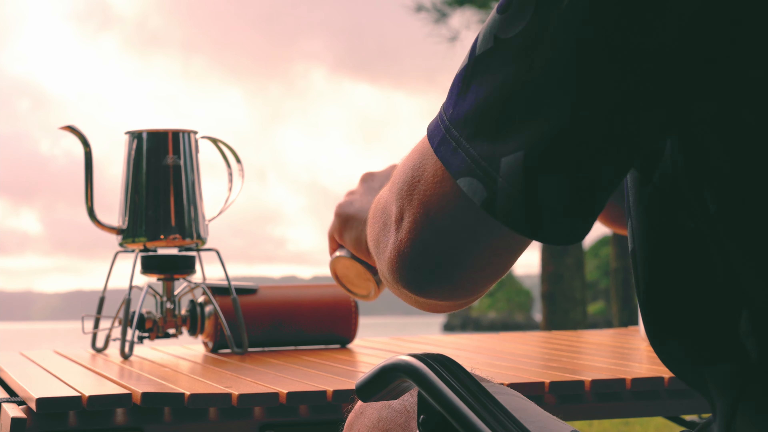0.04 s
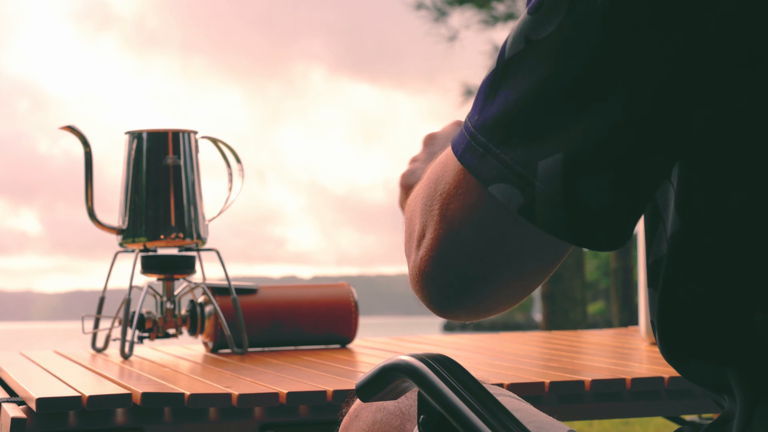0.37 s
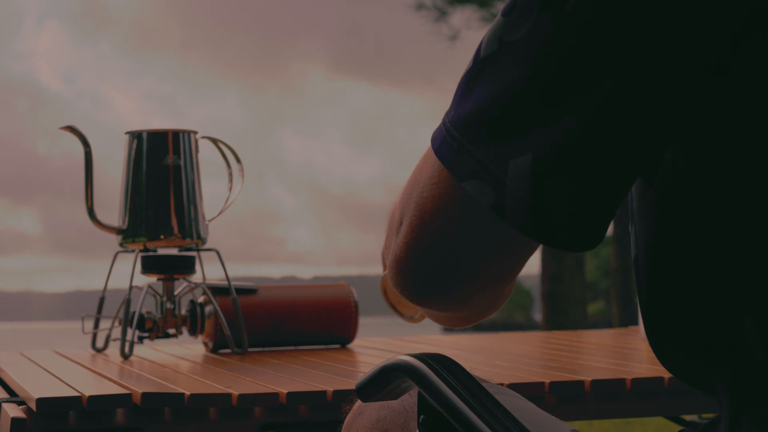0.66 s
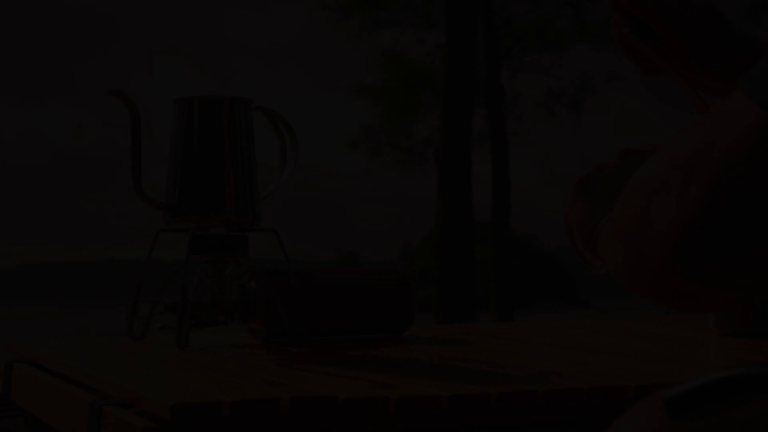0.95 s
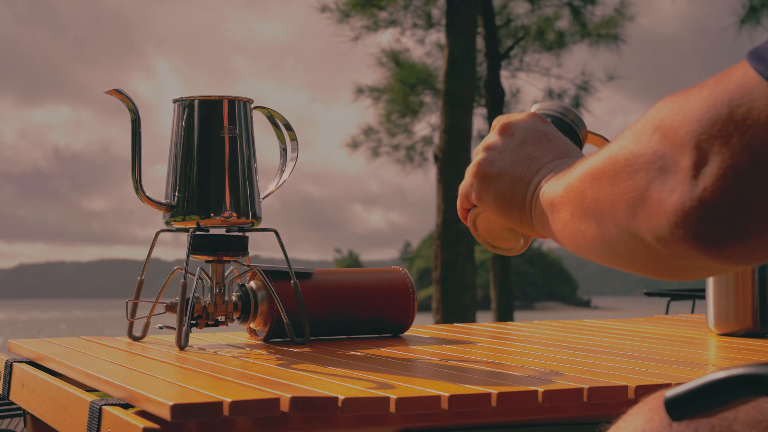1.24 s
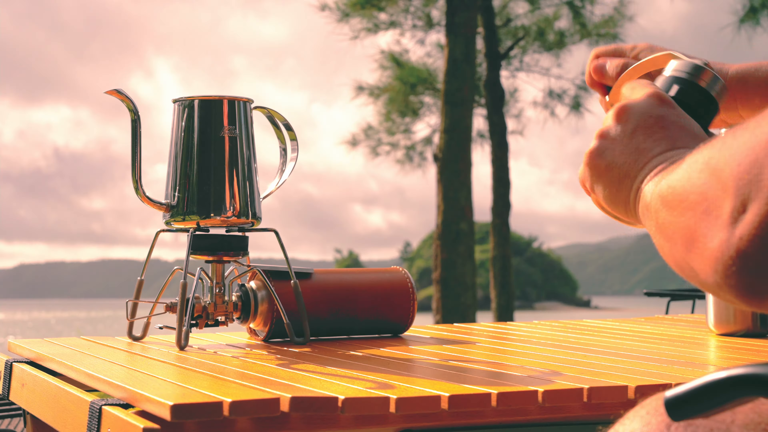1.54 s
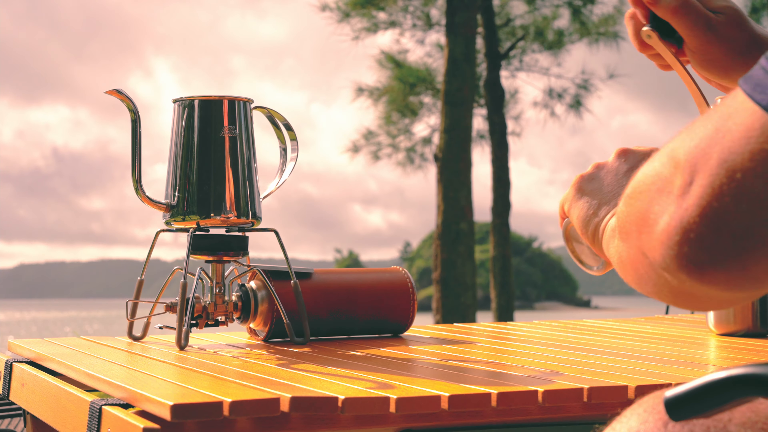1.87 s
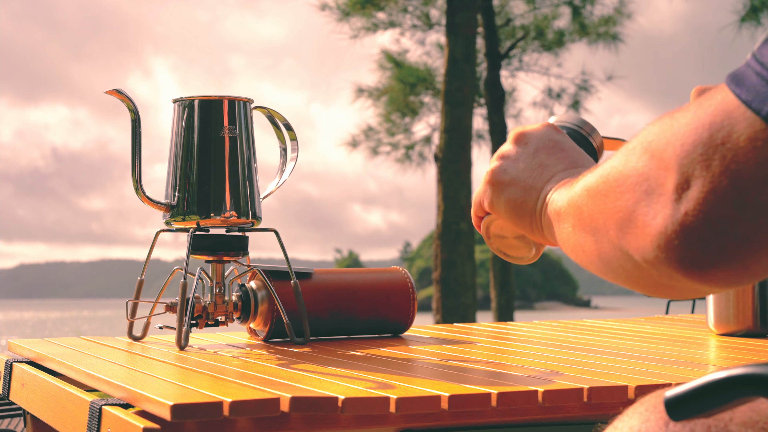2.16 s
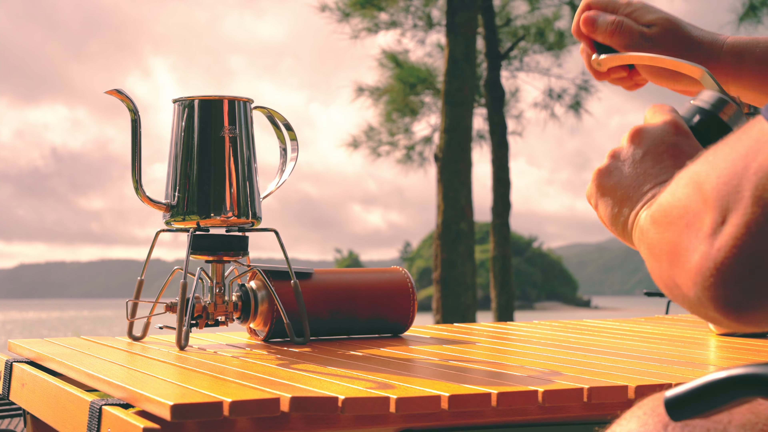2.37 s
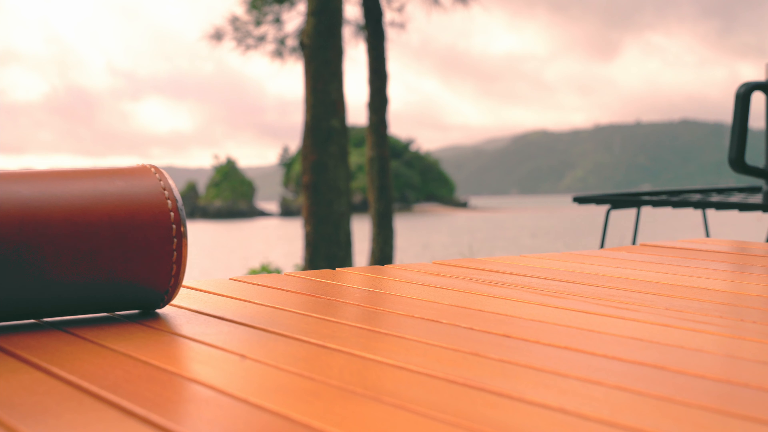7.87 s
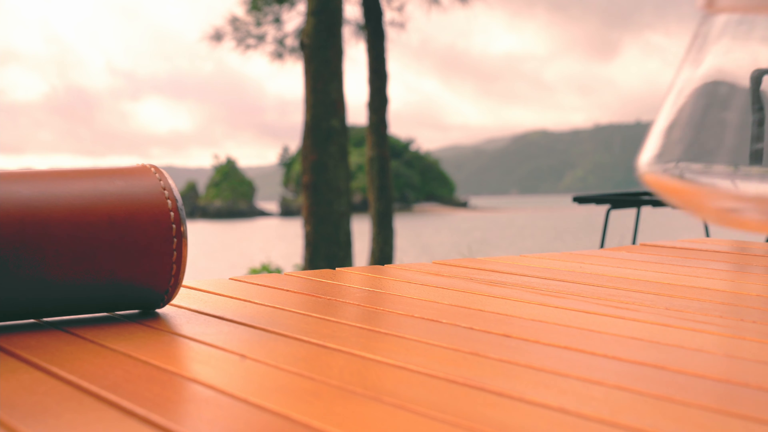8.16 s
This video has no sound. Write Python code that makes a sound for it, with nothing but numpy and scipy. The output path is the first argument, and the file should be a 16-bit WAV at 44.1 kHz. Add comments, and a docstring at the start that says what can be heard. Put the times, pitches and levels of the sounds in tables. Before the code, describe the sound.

A hand coffee grinder is cranked close to the microphone outdoors. Beans crunch and crack in uneven pushes, with a rasp on most turns and an occasional faint metallic squeak. A thin, high hiss lies behind it, and light wind brushes the microphone. After about seven seconds the grinding and thin hiss break off abruptly, leaving the broader, steady hiss of a gas burner.

```python
"""At a wooden camp table outdoors, a hand coffee grinder is cranked. Beans fracture between the steel burrs,
every grain excites the resonances of the shell, and friction makes the burrs squeak now and then. A thin steady
hiss lies behind it and light wind brushes the microphone. Then the scene changes: the grinding and the thin
hiss give way to the broader hiss of a gas burner."""
import sys
import numpy as np
from scipy import signal
from scipy.fft import rfft, irfft, next_fast_len
from scipy.io import wavfile

SR = 44100
rng = np.random.default_rng(int(sys.argv[2]) if len(sys.argv) > 2 else 0)


def transcribe(signal):
    """Save signal, clipped to [-1, 1], as a 16-bit WAV file at the path in sys.argv[1]."""
    frames = np.atleast_2d(signal).T
    limited = np.clip(frames, -1, 1)
    pcm = np.round(limited * 32767).astype(np.int16)
    wavfile.write(sys.argv[1], SR, pcm)


N = 371322
TIME = np.arange(N) / SR
FFT_SIZE = 2 * next_fast_len(N // 2 + SR // 4)
HZ = np.maximum(np.arange(FFT_SIZE // 2 + 1) * SR / FFT_SIZE, 1)

# resonances of the shell and catch cup: (frequency [Hz], bandwidth [Hz], lift [dB])
SHELL_MODES = [(706, 50, 8.3), (790, 50, -1.5), (865, 60, 4), (950, 55, 5.8), (1040, 60, 3), (1158, 50, -4),
               (1236, 60, 7), (1388, 55, 4), (1612, 70, 7), (1838, 65, 6.5), (1935, 50, -3), (2032, 60, 4),
               (2135, 50, -1.5), (2290, 90, 2), (2465, 50, -2), (2548, 60, 4.5), (2670, 70, -1.5),
               (2900, 90, 2), (3350, 250, 2), (3650, 80, 2.5), (5100, 330, 6.5)]
# modes of the steel burr: (frequency [Hz], bandwidth [Hz])
BURR_MODES = [(706, 26), (6975, 70), (10270, 120), (13685, 90)]
# stereo image of the grinder: (frequency [Hz], left minus right [dB], coherence [0-1])
GRINDER_IMAGE = [(390, 5, 1), (750, 8.5, 0.98), (1370, 8, 0.4), (2160, 6.5, 0.42), (3080, 3.5, 0.58),
                 (4140, 5, 0.39), (5800, 3, 0.42), (8060, -3, 0.2), (12000, 4.5, 0.2)]
# scrapes of the burr, at most one a turn: (peak time [s], rasp level [dB], shell ring level [dB])
SCRAPES = [(0.14, -43, -45), (0.68, -31.5, -47), (1.43, -40, -45.0), (1.93, -37, -44), (2.42, -41, -42),
           (2.87, -30, -42), (3.35, -32.5, -44.5), (3.85, -32.0, -46), (5.35, -36, -50), (5.86, -34, -50),
           (6.36, -30.5, -38), (6.83, -35, -52), (7.26, -35.5, -42)]


def crushing():
    """Brittle fracture excites the shell: coarse pieces drive its low modes, small ones its high modes."""
    # breaking beans: (time [s], peak of middling [dB], coarse [dB], small pieces [dB], crumble time [s])
    cracks = [(0.2086, -24, -39.0, -25.5, 0.011), (0.361, -21, -48, -27, 0.0058),
              (0.438, -26, -37, -34.5, 0.0077), (0.6017, -33, -30, -35, 0.0066),
              (0.8164, -26.5, -49, -31, 0.0071), (0.8575, -26, -35, -38.5, 0.0143),
              (1.0617, -36, -31, -30, 0.0049), (1.2074, -21.5, -40, -33, 0.0071),
              (1.2406, -26.5, -35.5, -31, 0.041), (1.476, -30.0, -43, -31, 0.0299),
              (1.667, -31, -43, -31, 0.0095), (1.7056, -26, -47, -32, 0.019),
              (1.777, -35, -37.5, -27.5, 0.011), (1.8606, -23.5, -42, -32, 0.0051),
              (2.1462, -29, -48, -33.0, 0.032), (2.1909, -29.5, -33, -34, 0.019),
              (2.2223, -28.5, -37.0, -34, 0.034), (2.3019, -37, -32, -38, 0.008),
              (2.4496, -32, -43, -31, 0.0077), (2.5776, -28.5, -31, -26, 0.02),
              (2.6305, -27.5, -35.5, -29, 0.035), (2.6593, -27, -35, -34, 0.019),
              (2.678, -24, -38, -36, 0.0053), (2.815, -25, -44, -36, 0.014), (2.8849, -34, -56, -33, 0.011),
              (3.0267, -25.0, -50, -29, 0.0097), (3.215, -29, -32, -33, 0.013),
              (3.251, -22, -32.0, -38, 0.008), (3.3124, -24.5, -30.5, -33, 0.0074),
              (3.3476, -27, -36, -45, 0.014), (3.4517, -23, -38, -27, 0.0081), (3.697, -30, -30, -33, 0.01),
              (3.8318, -34, -38, -33, 0.051), (3.9756, -25.5, -52, -25.5, 0.013),
              (3.991, -23, -38, -27, 0.018), (4.1135, -24.5, -33.5, -41, 0.019),
              (4.2755, -34, -41, -37, 0.0041), (4.3483, -27, -28.5, -34, 0.0075),
              (4.3751, -31, -33, -35.5, 0.0075), (4.4558, -24, -40.0, -24, 0.035),
              (4.5244, -28, -36, -35, 0.0126), (4.567, -22, -31.5, -30, 0.024),
              (4.6393, -28.5, -51, -30, 0.02), (4.675, -32, -37, -39, 0.012),
              (4.7675, -24, -38.5, -35, 0.031), (4.8234, -36, -38, -25.5, 0.0281),
              (4.847, -27, -34, -22.5, 0.01), (4.9045, -26.5, -27.5, -25.5, 0.011),
              (4.957, -26, -49, -22, 0.013), (5.0343, -27.5, -39.5, -30.0, 0.0096),
              (5.0496, -29, -42, -32, 0.062), (5.092, -34, -32.5, -28.5, 0.021),
              (5.1765, -28.0, -35, -33.5, 0.0079), (5.216, -27, -35.5, -34, 0.036),
              (5.311, -31, -36.5, -45, 0.018), (5.5614, -23.5, -37, -31, 0.0098),
              (5.5759, -27, -42.0, -29, 0.028), (5.6115, -27.5, -32.5, -33.0, 0.05),
              (5.657, -34, -33.5, -34, 0.028), (5.795, -33, -45, -39, 0.0089),
              (6.0844, -23, -48, -31.0, 0.012), (6.1231, -27, -51, -37, 0.0109),
              (6.1853, -27.5, -38, -36, 0.0054), (6.2522, -26, -44, -35, 0.033),
              (6.621, -38, -27, -36, 0.0067), (6.6854, -25.5, -39, -38, 0.038),
              (6.742, -26.5, -35, -35, 0.011), (6.8116, -26.5, -35, -29, 0.017),
              (6.848, -20, -33, -34.5, 0.009), (7.029, -24.5, -49, -34, 0.0067),
              (7.0897, -34, -45, -30.5, 0.0179), (7.1656, -29.5, -34.5, -35, 0.037),
              (7.2673, -29.5, -37, -39.0, 0.022), (7.338, -32, -34, -40, 0.0072)]
    # crushing heard through the shell: (frequency [Hz], level [dB])
    spectrum = [(200, -57.5), (380, -32), (500, -19), (630, -10), (850, -5), (1400, -4), (2400, 5.5),
                (3000, -0.5), (4000, -6.5), (6000, -12.5), (10000, -23.5), (16000, -22)]
    # independent clumping of each size of piece: (middling [0-1], coarse [0-1], small [0-1])
    own_clumping = [0.092, 0.3, 0.15]
    coarse_edge_hz, small_edge_hz = 1130, 3086
    steady_trim_db, crack_trim_db = -0.2, [-0.6, -0.4, -0.8]
    below_coarse = 1 / (1 + (HZ / coarse_edge_hz) ** 10)
    below_small = 1 / (1 + (HZ / small_edge_hz) ** 10)
    bands = np.sqrt([below_small - below_coarse, below_coarse, 1 - below_small])
    shell = response(spectrum, SHELL_MODES)
    common_clumps = clumps(per_s=170, fall_s=0.0046, share=0.28)
    out = 0
    for k, load_db in enumerate(crank_load()):
        avalanches = np.zeros(N)
        for s, *peak_db, crumble_s in cracks:
            avalanche = burst(s, rise_s=0.00053, fall_s=crumble_s)
            add(avalanches, s, from_db(peak_db[k] + crack_trim_db[k]) * avalanche)
        own_clumps = clumps(per_s=110, fall_s=0.0034, share=own_clumping[k])
        steady = from_db(load_db + steady_trim_db) * common_clumps * own_clumps
        force = grains(per_s=6000, spread_db=0.5) * steady
        force += grains(per_s=12000, spread_db=0.5) * avalanches
        out = out + radiate(force, unit_rms(shell * bands[k]), GRINDER_IMAGE)
    return out


def crank_load():
    """Crushing follows the load: levels in dB of middling, coarse and small pieces as the arm pushes."""
    # pushes: (start [s], length [s], middling level [dB], coarse level [dB], build-up over the push [dB])
    strokes = [(0.03, 0.15, -31.5, -40, -1), (0.313, 0.26, -31, -40, -0.5), (0.58, 0.43, -32.5, -41, 2.5),
               (1.23, 0.28, -32.5, -39.5, 2), (1.63, 0.364, -32.0, -43, 0.5),
               (2.05, 0.33, -33.5, -40.5, -0.5), (2.4, 0.081, -32.5, -43.5, -2.0),
               (2.63, 0.356, -32.5, -40.5, 2), (3.05, 0.47, -33.0, -41.5, -0.5),
               (3.512, 0.39, -31.5, -39.5, -1), (4.082, 0.35, -31.5, -43.5, -3.5),
               (4.48, 0.25, -35, -45, 7), (4.765, 0.59, -32.5, -45, -1.0), (5.556, 0.39, -31.5, -40, 3),
               (6.035, 0.46, -31, -41, 2), (6.59, 0.34, -32.5, -41, -2), (6.97, 0.404, -33.0, -42.5, -2.5)]
    fill_db = 0.12 * TIME  # the slack between pushes grows fuller as grounds build up
    slack_db = np.array([-34.5 + fill_db, -44.5 + fill_db])  # middling, coarse
    load_db = slack_db.copy()
    for s, length_s, *levels_db, build_db in strokes:
        push_db = np.array(levels_db)[:, None] + build_db * ((TIME - s) / length_s - 0.5)
        load_db += held(s, length_s, rise_s=0.018, fall_s=0.02) * (push_db - slack_db)
    middling_db, coarse_db = load_db
    small_db = -38.5 + middling_db - middling_db.mean()
    return middling_db, coarse_db, small_db


def moving_contact(crunch, depth_db, rate_hz, bands=22):
    """Modal coupling varies as the contact travels round the burr: bands swell and fade independently."""
    band_position = np.interp(np.log(HZ), np.log([600, 4200]), [0, bands - 1])
    spectrum, out = rfft(crunch, FFT_SIZE), 0
    for k in range(bands):
        band = np.clip(1 - np.abs(band_position - k), 0, 1)
        swell_db = depth_db * drift(rate_hz) * (k < bands - 1)  # the top band stays steady
        out = out + irfft(spectrum * band)[:, :N] * unit_rms(from_db(swell_db))
    return out


def running_empty():
    """Less excitation, less sound: a gain that dips while the burrs have little to bite on."""
    # lulls: (time [s], length [s], level [dB])
    lulls = [(.57, 0.039, -4), (1.02, 0.091, -3.5), (1.09, 0.041, -1.5), (1.57, 0.055, -1),
             (2.03, 0.029, -4), (2.375, .05, -2), (2.996, 0.036, -0.5), (3.193, 0.029, -1.5),
             (3.476, .03, -3), (4.04, .04, -1), (4.442, 0.022, -1), (6.01, 0.025, -1), (6.92, .06, -0.5),
             (7.394, .06, -1.5)]
    return from_db(sum(db * np.exp(-(2 * (TIME - s) / length_s) ** 2) for s, length_s, db in lulls))


def snapping(lag_s):
    """Sudden stress release: a hard bean splits with an impulse, and one half gives way just after."""
    # hard beans: (time [s], level [dB])
    snaps = [(.8175, -9), (2.58, -1), (3.9945, -8), (4.4625, -5), (4.956, 4.5), (5.564, -13)]
    # the click: (frequency [Hz], level [dB])
    spectrum = [(300, -65), (700, -24), (1600, 2), (2500, 20), (4300, 15), (6500, -24), (15000, -31)]
    clicks = np.zeros((2, N))
    for s, db in snaps:
        add(clicks[0], s, from_db([db]))
        add(clicks[1], s + lag_s * rng.uniform(0.33, 1.16), from_db([db]) / 2)
    return radiate(clicks, response(spectrum), GRINDER_IMAGE)


def scraping(gain_db, swell_s, fade_s, rough_db):
    """Friction noise: grounds dragged through the narrow side of the gap rasp at a sinking pitch."""
    centre_hz, width_hz, fall_hz_per_s, settle_s = 2330, 190, 1700, 0.13
    lowpass = signal.butter(2, width_hz / 2, fs=SR, output="sos")
    rasp = unit_rms(signal.sosfilt(lowpass, grains(per_s=2800, spread_db=0.5) + 1e-18))
    rasp *= from_db(rough_db * drift(47))
    rasp = rasp + 1j * np.roll(rasp, SR, axis=1)  # quadrature noise, shifted up to pitch below
    out = np.zeros((2, N))
    for s, db, _ in SCRAPES:
        near = np.abs(TIME - s) < 0.3
        age = TIME[near] - s
        hz = centre_hz + fall_hz_per_s * settle_s * (np.exp(-age / settle_s) - 1)
        carrier = np.exp(2j * np.pi * np.cumsum(hz) / SR)
        swell = np.exp(-(age / np.where(age < 0, swell_s, fade_s)) ** 2 / 2)
        out[:, near] += from_db(db + gain_db) * swell * np.real(rasp[:, near] * carrier)
    shell = response([(20, 0), (20000, 0)], SHELL_MODES)
    return radiate(out, shell, image=[(2000, 20, 0.32), (2600, 11.0, 0.68)])


def shell_ringing(gain_db, lead_s, swell_s):
    """Resonance: just ahead of each scrape the grounds drive a close pair of the shell's modes."""
    # the pair of modes: (frequency [Hz], bandwidth [Hz], left level [dB], right level [dB])
    modes = [(2532, 26, 2.5, -9), (2562, 16, -14, 1)]
    swell = sum(from_db(db + gain_db) * np.exp(-((TIME - s + lead_s) / swell_s) ** 2 / 2)
                for s, _, db in SCRAPES)
    out = 0
    for hz, width_hz, *port_db in modes:
        force = grains(per_s=2800, spread_db=-0.5)[0]
        out = out + from_db(port_db)[:, None] * resonate(force, hz, width_hz)
    return swell * out


def splintering(spray_db, ring_db):
    """Brittle husks fracture in bright sprays over a rustle of fines; both excite the burr's modes."""
    # splintering husks: (time [s], peak level [dB], scatter time [s])
    splinters = [(0.0031, -28, 0.024), (0.2616, -30, 0.018), (0.3601, -30, 0.004), (0.5669, -32, 0.014),
                 (0.6081, -27, 0.012), (0.7509, -31, 0.016), (0.8531, -32, 0.0077), (0.9508, -31, 0.0088),
                 (1.0829, -32, 0.013), (1.1043, -24.5, 0.0091), (1.1912, -30.5, 0.032),
                 (1.2672, -30, 0.007), (1.3084, -27.5, 0.018), (2.0335, -31, 0.008), (2.146, -31, 0.013),
                 (2.1654, -33, 0.022), (2.3798, -28.5, 0.013), (2.5771, -30, 0.004), (2.6382, -36, 0.029),
                 (2.743, -29, 0.007), (3.2393, -31, 0.008), (3.259, -29, 0.005), (3.2968, -29, 0.005),
                 (3.3103, -29, 0.009), (3.497, -29, 0.023), (3.7182, -28, 0.0063), (3.7438, -33, 0.0071),
                 (3.8053, -29, 0.009), (3.8387, -25, 0.014), (3.9557, -28.5, 0.024), (3.9914, -24, 0.004),
                 (4.2509, -34, 0.008), (4.4599, -30, 0.021), (4.5582, -34, 0.01), (4.5724, -33, 0.015),
                 (4.631, -31, 0.008), (4.64, -35, 0.01), (4.8453, -37, 0.0083), (5.4874, -29, 0.012),
                 (5.5012, -33, 0.019), (5.561, -25, 0.0033), (5.5721, -32, 0.048), (5.6023, -36, 0.037),
                 (6.2504, -39, 0.005), (6.51, -32, 0.014), (6.5438, -31, 0.004), (6.622, -30, 0.004),
                 (6.8301, -30, 0.007), (6.9659, -29.5, 0.012), (7.0698, -32, 0.057), (7.1285, -25, 0.0036),
                 (7.1362, -26.5, 0.015)]
    # husks and fine grounds: (frequency [Hz], level [dB])
    spectrum = [(600, -24.5), (2500, 2.5), (5000, -1), (8000, 5), (12000, 2), (14500, 1), (15700, 6.5)]
    sprays = np.zeros(N)
    for s, db, scatter_s in splinters:
        add(sprays, s, from_db(db + spray_db) * burst(s, rise_s=0.0003, fall_s=scatter_s))
    fines = grains(per_s=4200, spread_db=1.5) * from_db(-43 + 2.0 * drift(10))
    fines *= clumps(per_s=70, fall_s=0.0089, share=0.85)
    force = fines + grains(per_s=6000, spread_db=1.0) * sprays
    burr = response(spectrum, [(hz, width_hz, ring_db) for hz, width_hz in BURR_MODES])
    return radiate(force, burr, GRINDER_IMAGE)


def squeaking(gain_db, waver, rough_db, pan_db):
    """Friction-excited vibration: the steel burrs rub for a moment and their modes sing unsteadily."""
    # rubs: (time [s], peak level of each of the four burr modes from low to high [dB])
    rubs = [(.109, -44, -38, -41, -45), (.601, -52, -41, -41, -39), (.63, -58, -44, -44, -48),
            (.99, -47, -44, -54, -50), (1.297, -58, -45, -48, -50), (1.912, -46, -44, -42, -52),
            (1.955, -48, -56, -55, -48), (2.378, -45, -42, -40, -35), (3.01, -63, -45, -52, -56),
            (3.305, -42, -43, -38, -40), (3.839, -33.5, -33, -35, -30), (4.548, -75, -51, -48, -45),
            (6.825, -42, -37, -42, -49), (7.125, -56, -45, -48, -42)]
    out = 0
    for k, (hz, _) in enumerate(BURR_MODES):
        envelope = np.zeros(N)
        for s, *mode_db in rubs:
            add(envelope, s, from_db(mode_db[k] + gain_db) * burst(s, rise_s=0.015, fall_s=0.01))
        envelope *= from_db(rough_db * drift(53))
        pitch_hz = hz * (1 + waver * drift(164))
        out = out + envelope * np.sin(2 * np.pi * np.cumsum(pitch_hz) / SR)
    return out * from_db([[pan_db / 2], [-pan_db / 2]])


def whistle(start_s, length_s, hz, width_hz, level_db):
    """Narrow-band noise is heard as a pitch: a faint thin whistle."""
    tone = resonate(rng.standard_normal((2, N)), hz, width_hz)
    return from_db(level_db) * held(start_s, length_s, rise_s=0.08, fall_s=0.03) * tone


def table_echoes(direct, wet_db, t60_s):
    """Early reflections from table top, kettle and arms: a brief scatter, different in each ear."""
    age = np.arange(SR // 8) / SR
    tail = rng.standard_normal((2, len(age))) * from_db(-60 * age / t60_s)
    tail /= np.sqrt(np.sum(tail ** 2, axis=1, keepdims=True))
    return direct + from_db(wet_db) * signal.fftconvolve(direct, tail, axes=1)[:, :N]


def gas_burner(level_db, flutter_db):
    """Broadband noise: the burner hisses with a slight flutter in amplitude."""
    # the burner's hiss: (frequency [Hz], level [dB])
    spectrum = [(100, -38), (350, -26.5), (550, -16.5), (1400, -18), (1950, -15.5), (2350, -4),
                (3100, -1.5), (3700, -4.5), (4900, 0.5), (6300, -5), (7500, -4), (9000, -3), (11300, -19),
                (13500, -26), (15500, -24)]
    # its stereo image: (frequency [Hz], left minus right [dB], coherence [0-1])
    image = [(200, -1, 1), (1200, 3.5, 0.76), (1900, 3, 0.47), (3580, 0, 0.73), (5040, 0, 0.12),
             (6360, 0.5, 0.23), (8300, 3.5, 0.27), (12600, 3, 0.17), (14700, 3.5, .65)]
    noise = rng.standard_normal((2, N)) * from_db(level_db + flutter_db * drift(28))
    return radiate(noise, response(spectrum), image)


def thin_hiss(level_db):
    """Stationary noise, thin because its power gathers near 9 kHz."""
    # the hiss: (frequency [Hz], level [dB])
    spectrum = [(150, -49), (350, -38), (1500, -13), (3500, -18.5), (5100, -8.5), (6500, -14.5),
                (7900, -14), (8550, -1.5), (9130, 5), (9650, -3), (10500, -25), (13000, -61), (14900, -12),
                (15700, -8.5)]
    # its stereo image: (frequency [Hz], left minus right [dB], coherence [0-1])
    image = [(200, 7, 0.93), (2000, -15, 0.33), (7440, -1, 0.1), (9460, -5, 0.034), (10800, 8, 0.15),
             (15500, 8, .2)]
    return radiate(rng.standard_normal((2, N)) * from_db(level_db), response(spectrum), image)


def wind(lumps_db):
    """Pressure fluctuations of wind on the microphone: a lumpy rumble, much the same in both ports."""
    # gusts: (start [s], length [s], level [dB])
    gusts = [(1, 0.11, -57), (1.83, 0.1, -70), (2.34, 0.23, -65), (2.74, 0.037, -73), (2.963, .06, -83),
             (3.817, 0.26, -71), (4.28, 0.067, -71), (4.746, 0.12, -73), (7.583, 0.25, -60)]
    # light air between them: (time [s], level [dB])
    breeze = [(0, -76.5), (.9, -77.5), (1.2, -66.5), (1.55, -77), (2.8, -70.5), (3.5, -76), (4.5, -72.5),
              (5.4, -74.5), (7.4, -76), (8.42, -70.5)]
    rumble = response([(15, -26), (30, -13), (55, -1.5), (110, -0.5), (190, -3.0), (300, -13.0),
                       (600, -15), (2000, -62)])
    flow = from_db(np.interp(TIME, *np.transpose(breeze)))
    flow += sum(from_db(db) * held(s, length_s, rise_s=0.034, fall_s=0.037) for s, length_s, db in gusts)
    flow *= from_db(lumps_db * drift(9.1))
    return flow * radiate(rng.standard_normal((2, N)), rumble, image=[(30, 0, 0.99), (150, 0, 0.82)])


def grains(per_s, spread_db):
    """A Poisson process of tiny fractures of uneven size, each pushing two ways: two rows, rms 1."""
    born = rng.random(N) < per_s / SR
    size = from_db(spread_db * np.minimum(rng.exponential(1, N), 4))
    return unit_rms(born * size * rng.standard_normal((2, N)))


def clumps(per_s, fall_s, share):
    """Shot-noise modulation: each crumb gives way in a brief spurt. A gain of mean power 1."""
    spurts = (rng.random(N) < per_s / SR) * rng.uniform(0.3, 1, N)
    power = signal.lfilter([1], [1, -np.exp(-2 / (fall_s * SR))], spurts)
    return np.sqrt(1 - share + share * power / power.mean())


def radiate(pair, colour, image):
    """Partial coherence: two unrelated excitations are filtered and mixed into two microphone ports."""
    # phase by which the left port leads: (frequency [Hz], phase [rad])
    port_phase = [(200, 0), (900, .1), (1460, 1.3), (1810, 1.6), (2200, 2.9), (4300, 3.6), (5100, 3.1),
                  (7500, 5.5), (9000, 8.3), (10100, 7.2), (13800, 10.6), (16000, 11.8)]
    pan_db, coherence = over_frequency(image)
    coherence = np.clip(coherence, 0, 0.999)
    shared, apart = rfft(pair, FFT_SIZE) * colour * np.sqrt([1 + coherence, 1 - coherence])
    left = (shared + apart) * from_db(pan_db)
    right = (shared - apart) * np.exp(-1j * over_frequency(port_phase)[0])
    return irfft(np.array([left, right]) / np.sqrt(1 + from_db(pan_db) ** 2))[:, :N]


def response(spectrum, resonances=()):
    """A minimum-phase filter of unit power: a smooth slope with Lorentzian resonance peaks."""
    peaks_db = sum(lift_db / (1 + (2 * (HZ - hz) / width_hz) ** 2) for hz, width_hz, lift_db in resonances)
    magnitude = unit_rms(from_db(over_frequency(spectrum)[0] + peaks_db))
    cepstrum = irfft(np.log(magnitude))
    return np.exp(rfft(2 * cepstrum[:FFT_SIZE // 2], FFT_SIZE) - cepstrum[0])


def resonate(force, hz, width_hz):
    """Forced response of one damped mode, at rms 1."""
    return unit_rms(signal.lfilter(*signal.iirpeak(hz, hz / width_hz, fs=SR), force + 1e-18))


def drift(rate_hz):
    """Random fluctuation: noise low-passed at rate_hz, rms 1."""
    hop, warm_up = 40, 2000
    pole = np.exp(-2 * np.pi * hop * rate_hz / SR)
    noise = rng.standard_normal(N // hop + warm_up + 2)
    slow = signal.lfilter([1], [1, -2 * pole, pole * pole], noise)[warm_up:]
    return np.interp(np.arange(N) / hop, np.arange(len(slow)), unit_rms(slow))


def burst(s, rise_s, fall_s):
    """Exponential rise and decay: a short envelope from time s on, peak 1."""
    age = np.clip(TIME[int(s * SR):int(s * SR) + SR // 4] - s, 0, None)
    shape = (1 - np.exp(-age / rise_s)) * np.exp(-age / fall_s)
    return shape / shape.max()


def held(s, length_s, rise_s, fall_s):
    """A trapezoidal envelope: it rises at time s, holds at 1 and falls after length_s."""
    return np.clip(np.minimum((TIME - s) / rise_s, (s + length_s - TIME) / fall_s) + 0.5, 0, 1)


def add(track, s, piece):
    """Superpose a piece on a track from time s on."""
    at = int(s * SR)
    track[at:at + len(piece)] += piece[:N - at]


def over_frequency(rows):
    """Each column of a table, interpolated over log frequency."""
    hz, *columns = np.transpose(rows)
    return [np.interp(np.log(HZ), np.log(hz), column) for column in columns]


def from_db(db):
    """Decibels to amplitude ratio."""
    return 10 ** (np.asarray(db) / 20)


def unit_rms(x):
    """Scale a signal or spectrum to rms 1."""
    return x / np.sqrt(np.mean(np.abs(x) ** 2) + 1e-20)


def scene():
    """Superposition: the grinder over a thin hiss, then the burner; wind throughout."""
    grind_end_s, crossfade_s = 7.404, 0.0042
    grinder = moving_contact(crushing(), depth_db=2.0, rate_hz=6.6) * running_empty()
    grinder += snapping(lag_s=0.00219)
    grinder += scraping(gain_db=-2.0, swell_s=0.058, fade_s=0.067, rough_db=2.5)
    grinder += shell_ringing(gain_db=-0.5, lead_s=0.072, swell_s=0.085)
    grinder += splintering(spray_db=3.0, ring_db=5.0)
    grinder += squeaking(gain_db=2.0, waver=0.0039, rough_db=2.0, pan_db=6.5)
    grinder += whistle(start_s=7.05, length_s=0.35, hz=6000, width_hz=120, level_db=-51)
    grinder = table_echoes(grinder, wet_db=-18.0, t60_s=0.03)
    hiss = thin_hiss(level_db=-32.0)
    burner = gas_burner(level_db=-36.5, flutter_db=0.6)
    grinding = np.clip((grind_end_s - TIME) / crossfade_s + 0.5, 0, 1)
    return grinding * (grinder + hiss) + (1 - grinding) * burner + wind(lumps_db=2.5)


def record(dry):
    """Band limiting: a steep elliptic low-pass cuts the highest treble."""
    cutoff_hz = 15700
    return signal.sosfilt(signal.ellip(12, 0.1, 80, cutoff_hz, fs=SR, output="sos"), dry)


dry = scene()
out = record(dry)
transcribe(out)
```